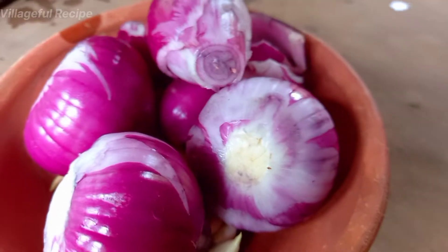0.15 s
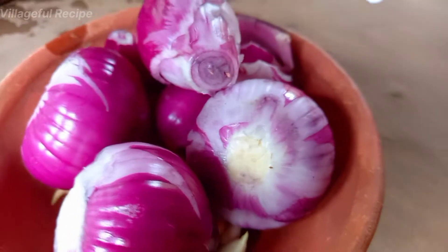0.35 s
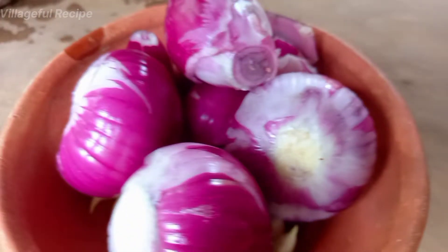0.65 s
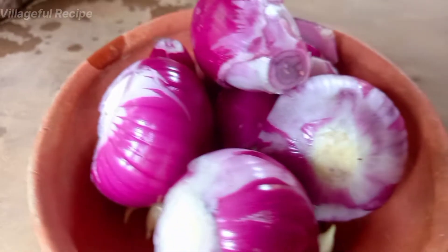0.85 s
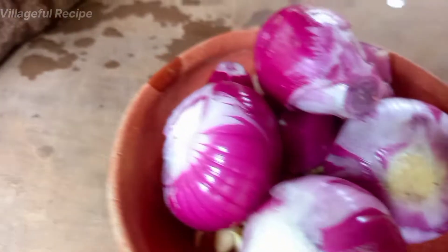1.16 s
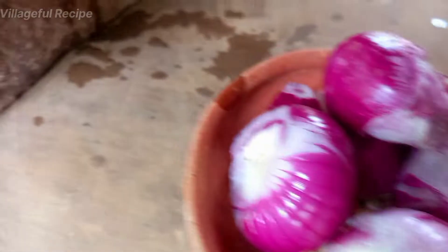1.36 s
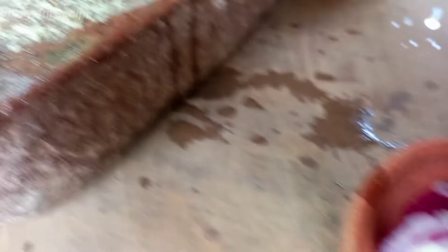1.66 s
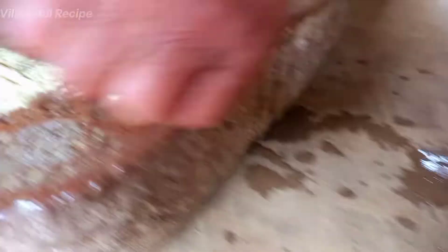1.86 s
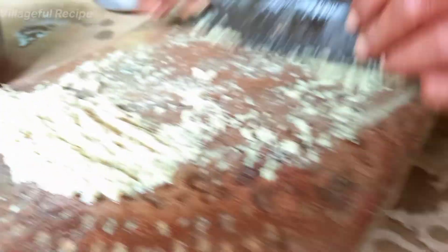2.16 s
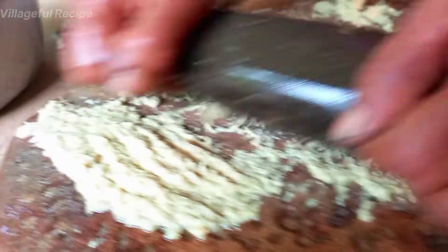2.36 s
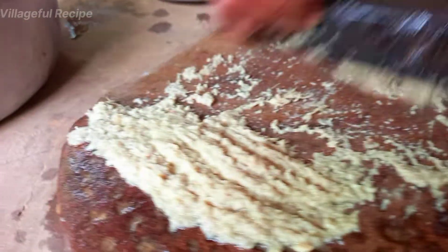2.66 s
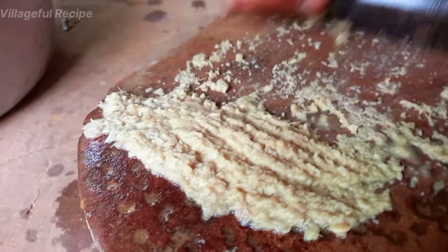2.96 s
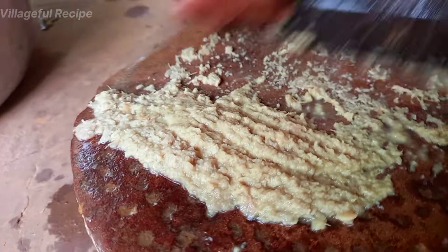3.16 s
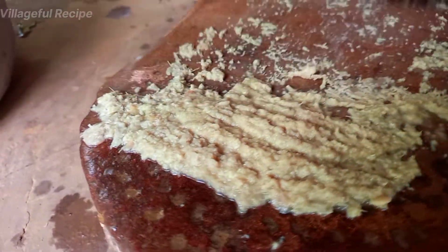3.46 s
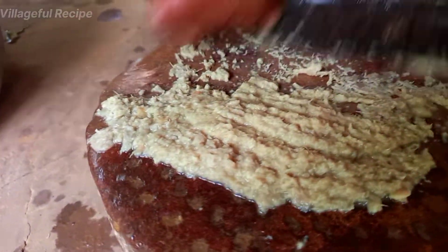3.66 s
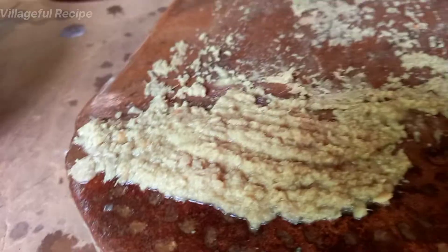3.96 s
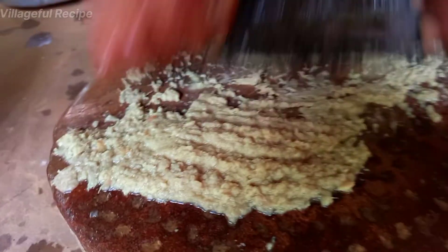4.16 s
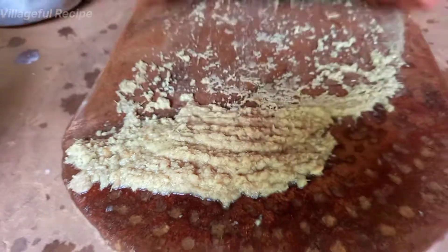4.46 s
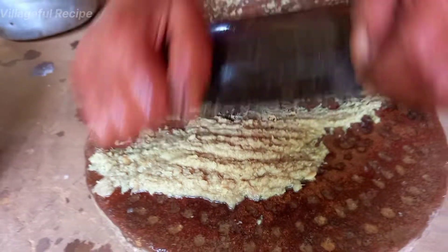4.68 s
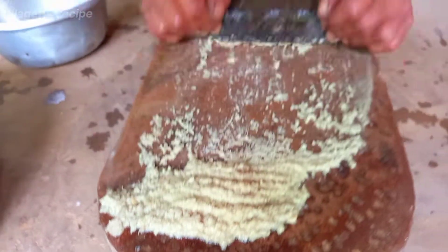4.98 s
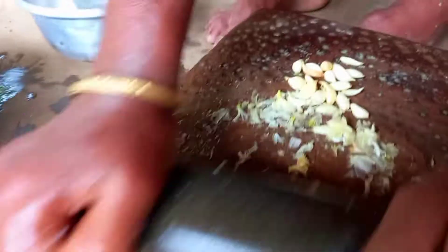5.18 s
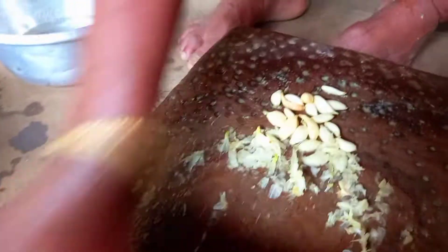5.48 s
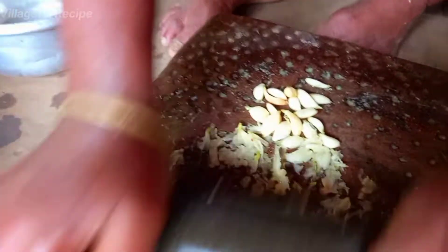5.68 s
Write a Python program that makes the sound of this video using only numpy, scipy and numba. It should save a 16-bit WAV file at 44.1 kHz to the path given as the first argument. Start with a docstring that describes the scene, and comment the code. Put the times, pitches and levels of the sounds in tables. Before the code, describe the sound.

Very close, a heavy stone roller is drawn back lightly and pushed forward harder over wet paste, roughly two full cycles a second. Strokes crackle and hiss; stone knocks and ringing scrapes cluster in the middle, then wetter, softer grinding follows. The slab rumbles underneath. A faint bird whistles twice far off. Small open room, short reflections, stereo microphones close to the slab.

```python
"""Grinding wet spice paste on a stone slab

Close by, a stone roller is pulled back lightly and pushed forward hard, about twice a second, in a small open room.
The paste crackles and pops: tiny clicks and hiss follow the strokes, and short noise bursts are the pops.
Where it is thin, grit chatters between the stones: random impacts and groans ring roller and slab as resonances.
The roller knocks as it is rocked, the slab rumbles on the floor, and a far bird whistles twice in gliding tones."""
import sys
import numpy as np
from scipy import signal
from scipy.fft import rfft, irfft
from scipy.io import wavfile
from scipy.ndimage import uniform_filter1d
from numba import njit

SR = 44100
rng = np.random.default_rng(int(sys.argv[2]) if len(sys.argv) > 2 else 0)


def pcm_store(signal):
    """Save signal as 16-bit PCM."""
    levels = np.round(np.clip(np.atleast_2d(signal), -1, 1) * 32767)
    wavfile.write(sys.argv[1], SR, levels.astype(np.int16).T)


N = 257012
TIME = np.arange(N) / SR

# resonances of the roller, its bending note first: [pitch_hz, width_hz, relative_db]
ROLLER_MODES = [(1589.8, 29, 10), (1508, 134, 1), (1624, 94, -11.5), (1976, 83, -11.5), (2170, 560, -20)]
# resonances of the slab: [pitch_hz, width_hz, relative_db]
SLAB_MODES = [(240, 148, -2), (510, 236, -4), (750.5, 58, 3.5), (985, 410, -21)]
# how stones and paste face the two microphones as these move, positive balance to the left:
# [time_s, roller_phase_rad, slab_phase_rad, roller_balance_db, slab_balance_db, paste_balance_db]
MICROPHONE_ASPECT = [(.2, 3.8, 1.5, 5, 0, 3), (.7, 3.7, 2, 1, 2, 3.5), (1.2, 4.45, 1.8, -2, 3, 4),
                     (1.65, 3.8, .8, 2, 5, 6), (2.15, 2, -.3, 6, 1, 5), (2.5, 1.3, -.9, 3, 3, 4),
                     (2.65, .7, -.7, -3, 3, 4), (3.5, .7, -.6, -3, 1, 5), (3.95, 1.3, -.4, -4, 4, 2),
                     (4.5, 1.5, -.2, 0, 7, 5), (5, 1, 0, 0, 6, 6), (5.5, 3.5, 0, 4, 4, 6.5)]
# a stroke that meets bare stone groans, gliding as the pressure changes:
# [start_s, end_s, squelch_db, roller_ring_db, slab_db, start_hz, end_hz]
GROAN_STROKES = [(0.962, 1.113, -30.5, -32.5, -35, 424, 755), (2.418, 2.56, -36, -28, -38, 433, 700),
                 (3.823, 3.994, -38.5, -25.5, -37, 393, 617), (4.009, 4.078, -44, -34, -37.5, 780, 800),
                 (5.23, 5.34, -60, -64, -62.5, 520, 490), (5.437, 5.665, -74, -78, -64, 780, 480)]


def undb(db):
    """Decibels to gain."""
    return 10 ** (np.asarray(db) / 20)


def curves(table):
    """Each column of a table, joined by straight lines in time."""
    s, *columns = np.transpose(table)
    return [np.interp(TIME, s, column) for column in columns]


def unit(response):
    """Scale a response to unit energy."""
    return response / np.sqrt(np.sum(response ** 2, axis=-1, keepdims=True))


def through(x, response):
    """Pass a sound through a response."""
    return signal.fftconvolve(np.atleast_2d(x), np.atleast_2d(response), axes=-1)[:, :N]


def add(track, start_s, sound):
    """Mix a sound in at a time."""
    i = int(start_s * SR)
    part = sound[..., :N - i]
    track[..., i:i + part.shape[-1]] += part


def peak(x, db, window_s):
    """Set the loudest short stretch of a sound to a level."""
    loudest = np.sqrt(uniform_filter1d(x ** 2, int(window_s * SR)).max())
    return x * undb(db) / loudest


def press(x, db, steady_s):
    """The hand's pressure holds a vibration near a level."""
    local_rms = np.sqrt(uniform_filter1d(x ** 2, int(steady_s * SR)) + 1e-9)
    return x / local_rms * undb(db)


def colour(x, points):
    """Shape a sound by (Hz, dB) points, keeping the power of white noise."""
    hz, db = np.transpose(points)
    log_hz = np.log(np.fft.rfftfreq(N, 1 / SR) + 1)
    gain = undb(np.interp(log_hz, np.log(hz), db))
    return irfft(rfft(x) * gain / np.sqrt(np.mean(gain ** 2)), N)


def cut(x, hz, kind):
    """Steep high-pass or low-pass."""
    return signal.sosfilt(signal.butter(4, hz, kind, fs=SR, output="sos"), x)


def split(x):
    """Part a sound at 9 kHz into its body and its top treble."""
    low = signal.sosfiltfilt(signal.butter(2, 9000, fs=SR, output="sos"), x)
    return low, x - low


@njit
def sweep(x, hz, width):
    """Band-pass whose centre moves every sample."""
    y, band, low = np.empty(len(x)), 0., 0.
    for i in range(len(x)):
        g, k = np.tan(np.pi * hz[i] / SR), width / hz[i]
        v = (band + g * (x[i] - low)) / (1 + g * (g + k))
        band, low, y[i] = 2 * v - band, low + 2 * g * v, k * v
    return y


def walk(rate):
    """A random wander with spread a little under 1, turning at `rate` points per second."""
    knots = rng.standard_normal(N // 20)
    return np.interp(TIME * rate, np.arange(len(knots)), knots)


def grains(rate, spread_db):
    """Random tiny impacts of unequal size, `rate` per second, rms 1."""
    hit = rng.random(N) < rate / SR
    size = undb(spread_db * np.minimum(rng.exponential(size=N), 4))
    x = hit * size * rng.choice([-1, 1], N)
    return x / np.sqrt(np.mean(x ** 2))


def body(modes):
    """Ring of a set of damped resonances; neighbours swing in opposite senses."""
    t = TIME[:SR // 4]
    ring = np.zeros(len(t))
    for k, (hz, width, db) in enumerate(modes):
        fade = np.exp(-np.pi * width * t)
        ring += (-1) ** k * undb(db) * width * fade * np.sin(2 * np.pi * hz * t)
    return unit(ring)


def scatter(t60):
    """Dense reflections of even colour, fading 60 dB in t60 seconds, unrelated left and right."""
    t = TIME[:SR // 2]
    fade = np.exp(-np.log(1000) * t / t60)
    h = rng.standard_normal((2, len(t))) * fade
    # alternately flatten the spectrum and restore the fade
    for _ in range(8):
        spectrum = rfft(h)
        h = irfft(spectrum / (np.abs(spectrum) + 1e-12), len(t)) * np.minimum(10 * fade, 1)
    return unit(h)


def place(x, phase, balance_db):
    """A vibrating body reaches the two microphones with different phase and level."""
    half = np.array([[1], [-1]]) / 2
    gain = undb(half * balance_db)
    turned = np.real(signal.hilbert(x) * np.exp(1j * half * phase))
    return turned * gain / np.sqrt(np.mean(gain ** 2, axis=0))


def strokes(part):
    """Level in dB of one part of the sound: each stroke rises, swells or sags, and falls away."""
    # drawn back lightly, the roller peels the paste off the slab:
    # [start_s, end_s, squelch_db, fizz_db, roller_ring_db, slab_db, rumble_db]
    pulls = [(0.005, 0.155, -49.5, -50, -60, -46, -48), (0.477, 0.652, -50.5, -47.5, -51.5, -52.0, -47.5),
             (0.891, 1.128, -66, -51, -39.5, -54, -49.0), (1.428, 1.628, -44.5, -37, -46.5, -56, -48),
             (1.875, 2.098, -47.5, -38, -45.5, -52.5, -50), (2.352, 2.547, -51.0, -41.5, -44, -61.5, -64),
             (2.857, 3.043, -46, -34.5, -43.5, -56.5, -49.5), (3.318, 3.521, -45.5, -32.5, -43, -51, -45),
             (3.77, 4.074, -46.5, -42.5, -47, -66, -61), (4.29, 4.51, -45, -36, -46.5, -57.5, -51),
             (4.762, 4.995, -46, -38.5, -50.0, -62, -54), (5.15, 5.373, -42.5, -35.5, -50, -52.5, -46.5),
             (5.596, 5.829, -42.5, -39.5, -49, -57, -51.5)]
    # pushed forward under the arms' weight, it crushes the paste; often a short rest follows:
    # [start_s, end_s, squelch_db, fizz_db, roller_ring_db, slab_db, rumble_db]
    pushes = [(0.125, 0.399, -40.5, -40.5, -48, -52.0, -47), (0.629, 0.888, -41.5, -43.5, -52, -51, -55),
              (1.113, 1.342, -35, -42, -49, -51, -48), (1.621, 1.853, -42, -41, -42, -51.0, -62),
              (2.104, 2.312, -38.0, -38.5, -38, -49.5, -57), (2.549, 2.791, -37.0, -40, -40, -51.5, -49.5),
              (3.055, 3.268, -38.5, -33, -42, -49.5, -50.5), (3.533, 3.758, -39, -36, -39, -49.5, -53.5),
              (4.016, 4.256, -32, -35, -39.5, -54, -47.5), (4.517, 4.741, -38.5, -37, -44.5, -56.5, -59),
              (4.999, 5.148, -39, -34.5, -42, -55.5, -74), (5.339, 5.598, -39.5, -41, -50, -57.5, -51.5)]
    # mid-stroke it bites through the paste and briefly scrapes stone:
    # [start_s, end_s, roller_ring_db, slab_db]
    bites = [(0.045, 0.115, -39, -43), (0.215, 0.29, -45, -55), (0.52, 0.595, -43.5, -48),
             (0.82, 0.865, -53, -54), (2.465, 2.545, -22, -40), (3.16, 3.24, -38, -55),
             (3.385, 3.465, -42.5, -59), (3.885, 3.97, -20, -32.5), (4.39, 4.475, -41.5, -58),
             (4.555, 4.645, -35.5, -58), (4.66, 4.71, -57, -48.5), (4.85, 4.95, -54, -61),
             (5.015, 5.11, -39, -70)]
    # how each part follows a stroke; pulls grow, pushes mostly die away:
    # {part: [attack_s, release_s, swell_db_per_s]}
    pull_shape, push_shape = {"squelch": (0.095, .033, 25), "fizz": (0.033, 0.064, 21),
                              "roller": (0.15, 0.083, 28), "slab": (0.089, 0.16, 68),
                              "rumble": (0.08, 0.11, 57)}, {"squelch": (0.072, 0.12, -55),
                                                  "fizz": (0.097, 0.084, -91.5),
                                                  "roller": (0.068, 0.14, -19), "slab": (0.053, .067, 2),
                                                  "rumble": (.015, 0.017, 12)}
    bite_shape, groan_shape = {"roller": (0.037, 0.051, -5), "slab": (0.034, .04, -1)}, {"squelch": (0.21, 0.047, 2),
                                                   "roller": (0.043, 0.056, 60), "slab": (0.032, 0.028, 41)}
    # how far under its full level a stroke starts and ends: {part: drop_db}
    edge_db = {"squelch": 20, "fizz": 21, "roller": 27.5, "slab": 23.5, "rumble": 17}
    # what is left while the roller rests between strokes: {part: level_db}
    rest_db = {"squelch": -65.5, "fizz": -63, "roller": -74, "slab": -74.5, "rumble": -60}

    power = undb(2 * rest_db[part])
    kinds = ((pulls, pull_shape), (pushes, push_shape), (bites, bite_shape), (GROAN_STROKES, groan_shape))
    for table, shape in kinds:
        if part not in shape:
            continue
        attack_s, release_s, swell_db_per_s = shape[part]
        for start, end, *levels in table:
            rising = np.maximum(1 - (TIME - start) / attack_s, 0)
            falling = np.maximum(1 - (end - TIME) / release_s, 0)
            db = dict(zip(shape, levels))[part] + swell_db_per_s * (TIME - (start + end) / 2)
            db -= edge_db[part] * (rising ** 2 + falling ** 2)
            power = power + undb(2 * np.maximum(db, -140))
    return 10 * np.log10(power)


def room_air():
    """Still air of the room: steady coloured noise, unrelated left and right."""
    # colour of the air: [pitch_hz, relative_db_per_hz]
    air_colour = [(20, -17), (80, -16.5), (500, -14), (1200, -60.5), (16000, -36)]
    return undb(-73.5) * colour(rng.standard_normal((2, N)), air_colour)


def bird():
    """A far bird's thin hoarse whistle swells, slides down and fades, heard through reflections."""
    # the falling whistles: [start_s, length_s, start_hz, end_hz]
    whistles = [(.64, 1.3, 2890, 2460), (3.4, 1.15, 2850, 2520)]
    song = np.zeros(N)
    for s, length, start_hz, end_hz in whistles:
        part = np.clip((TIME - s) / length, 0, 1)
        # quick wander of pitch and level makes it hoarse
        hz = (start_hz + (end_hz - start_hz) * part) * (1 + .018 * walk(300))
        level = undb(-55 + 2.8 * walk(45)) * np.sqrt(8 * part) * (1 - part)
        song += level * np.sin(2 * np.pi * np.cumsum(hz) / SR)
    return through(song, scatter(0.18))


def grate(modes, db, rate, spread_db, steady_s=0.032):
    """Grit slips and catches under the roller and rings a stone."""
    return press(through(grains(rate, spread_db), body(modes))[0], db, steady_s)


def rumble():
    """The heavy slab shudders on the floor under the moving weight and now and then rocks."""
    # resonances of the slab on the floor: [pitch_hz, width_hz, relative_db]
    rocking_modes = [(76, 22, -5), (114, 21, 0), (142, 30, -8), (235, 60, -14)]
    # the slab rocks: [time_s, level_db]
    thumps = [(0.168, -41), (0.335, -38.5), (0.79, -39), (2.595, -44.5), (3.659, -41), (4.082, -40.5),
              (4.183, -41), (5.105, -48.5), (5.31, -39.5), (5.519, -41)]
    shudder_db = strokes("rumble") + 2.5 * walk(11)
    low = grate(rocking_modes, shudder_db, rate=300, spread_db=4.5, steady_s=0.09)
    for s, db in thumps:
        add(low, s, peak(body(rocking_modes), db, 0.021))
    return place(low, .45 * walk(20), .7 + walk(12))


def knock(modes, length_ms, db):
    """A first contact, then a quick chatter of rebounds that locks onto the stone's strongest note."""
    t = TIME[:SR // 20]
    length = length_ms / 1000
    note_hz = max(modes, key=lambda mode: mode[2])[0]
    rebounds = rng.standard_normal(len(t)) / np.sqrt(length * SR)
    locked = 2.4 * np.cos(2 * np.pi * note_hz * t) / (length * SR)
    force = (rebounds + locked) * np.exp(-(t / length) ** 2)
    force[0] += .7
    ring = signal.fftconvolve(force, body(modes))
    # hands and paste damp the ring
    return peak(ring * np.exp(-TIME[:len(ring)] / .05), db, .009)


def knocks():
    """The rocked roller knocks on the slab: roller ring, slab thud and the crack of crushed grit."""
    # the blows: [time_s, chatter_ms, roller_ring_db, slab_db, clack_db]
    blows = [(0.167, 2.1, -25, -28.5, -22), (0.242, 2.9, -36.5, -36.5, -61),
             (0.666, 7.1, -34.5, -45, -29.5), (0.798, 7.9, -44, -36, -38), (1.176, 8, -24.5, -32.5, -19.5),
             (2.141, 29, -25.5, -57, -40), (2.593, 4.8, -16.5, -28, -24), (3.045, 1.5, -44, -39, -59),
             (3.104, 4.8, -19, -38, -56), (3.516, 2.6, -47, -41, -57), (3.579, 12, -26, -49, -41),
             (3.688, 5, -35.5, -44, -34.5), (3.96, 3.3, -37, -29, -26), (3.983, 2.6, -60, -27, -28),
             (4.01, 3.8, -40, -31, -32), (4.083, 38, -24, -32, -28)]
    # resonances of the clack: [pitch_hz, width_hz, relative_db]
    clack_modes = [(1060, 1000, -4), (1784, 37, 6), (1960, 330, -6), (2500, 280, -16), (4000, 190, -8)]
    roller, slab, cracks = np.zeros(N), np.zeros(N), np.zeros((2, N))
    for s, length_ms, ring_db, thud_db, clack_db in blows:
        add(roller, s, knock(ROLLER_MODES, length_ms, ring_db))
        add(roller, s, knock(clack_modes, length_ms, clack_db))
        # the chatter is half as long on the slab
        add(slab, s, knock(SLAB_MODES, length_ms / 2, thud_db))
        # a hard blow also crushes grit: a short broad crack
        add(cracks, s, peak(cut(scatter(.025), 4500, "low"), clack_db - 10, .004))
    return roller, slab, cracks


def groan():
    """Stick-slip rings the gliding contact spring: share of bare contact, low groan, upper rasp."""
    bare, hz = np.zeros(N), np.full(N, 500.)
    for start, end, *_, start_hz, end_hz in GROAN_STROKES:
        part = (TIME - start) / (end - start)
        bare += np.clip(10 * np.minimum(part, 1 - part), 0, 1)
        glide_hz = start_hz * (end_hz / start_hz) ** np.clip(part, 0, 1)
        hz = np.where((part > 0) & (part < 1), glide_hz, hz)
    slips = grains(rate=450, spread_db=2)
    low = sweep(sweep(slips, hz, 170.), hz, 300.)
    # the upper contact resonance climbs with the lower one
    rasp_hz = 620 + 1.93 * hz
    rasp = sweep(sweep(slips, rasp_hz, 390.0), rasp_hz, 630.0)
    return np.minimum(bare, 1), press(low, 0, 0.037), press(rasp, 0, 0.017)


def stones():
    """Roller and slab, rung by grating, groans and knocks, radiate to the two microphones."""
    # high modes woken by grit: [pitch_hz, width_hz, relative_db]
    grit_modes = [(3830, 160, -8.5), (4230, 84, -1), (4340, 110, -18), (5320, 81, -14)]
    # the grit lies unevenly, so both stones waver together
    uneven = walk(35)
    roller_db, slab_db = strokes("roller") + 0.98 * uneven, strokes("slab") + 2.84 * uneven
    roller_phase, slab_phase, roller_pan_db, slab_pan_db, _ = curves(MICROPHONE_ASPECT)
    bare, low, rasp = groan()
    roller_knocks, slab_knocks, cracks = knocks()

    # friction keeps the bending note singing while the damped modes rattle
    singing = grate(ROLLER_MODES[:1], roller_db - .5, rate=900, spread_db=1, steady_s=0.016)
    rattle = grate(ROLLER_MODES[1:], roller_db - 5.5, rate=700, spread_db=4)
    roller = singing + rattle + bare * undb(slab_db - 6.5) * rasp + roller_knocks
    # on bare stone the groan takes 70 % of the slab's power
    share = .7 * bare
    grating = grate(SLAB_MODES, slab_db, rate=610, spread_db=-2.0)
    slab = np.sqrt(1 - share) * grating + np.sqrt(share) * undb(slab_db) * low + slab_knocks

    # the roller is too small to radiate lows; turning, it swings its pattern across the microphones
    roller_swing, roller_sway_db = .3 * walk(35), 1.2 * walk(30)
    direct = place(cut(roller, 1030, "high"), roller_phase + roller_swing, roller_pan_db + roller_sway_db)
    direct += place(cut(slab, 1280, "low"), slab_phase + 0.25 * walk(70), slab_pan_db)
    # only bare stone is hard enough to wake the high modes; the floor scatters their short waves
    grit = bare * grate(grit_modes, roller_db - 16.5, rate=700, spread_db=3)
    scattered = through(grit + undb(-1.5) * cut(roller, 1670, "high"), scatter(0.0123))
    return direct + cracks + scattered


def pops():
    """Air pockets and fibres burst in the paste: each tears open over a millisecond or two."""
    # the bursts, treble against body: [time_s, level_before_colour_db, treble_db]
    bursts = [(0.174, -25.5, 31), (1.174, -24, 26), (1.255, -21, 0.5), (1.432, -40, 1), (1.602, -25.5, 2),
              (1.636, -27, 15), (2.119, -30.5, 7), (2.143, -28.5, 1), (2.558, -31, -6), (2.59, -23.5, 15),
              (2.663, -39, -16), (2.917, -27, 12.5), (3.044, -29.5, 9), (3.324, -35, 14.5),
              (4.097, -31, -3), (4.17, -28.5, -12), (4.313, -38.5, 4.5), (4.385, -23.5, 24),
              (5.168, -32.5, 15), (5.275, -18.5, 18), (5.407, -23, -1.5), (5.792, -24.5, 4.5)]
    track = np.zeros((2, N))
    age = TIME[:SR // 40] / 0.001
    for s, db, treble_db in bursts:
        low, high = split(rng.standard_normal((2, len(age))) * age * np.exp(-age))
        add(track, s, peak(low + undb(treble_db) * high, db, .002))
    return track


def paste():
    """Films of wet paste tear in countless tiny clicks over a fine hiss; larger pockets pop."""
    # colour of the wet crackle: [pitch_hz, relative_db_per_hz]
    paste_colour = [(300, -10.5), (1000, -5), (2000, 2), (3000, 3), (4200, 7), (5500, 4), (7000, 3),
                    (9000, 1), (11500, 4), (16000, 0)]
    clicks = through(grains(rate=1200, spread_db=4.7), scatter(.0035))
    hiss = rng.standard_normal((2, N))
    squelch, fizz = split(colour(undb(-9.5) * clicks + undb(-1.5) * hiss, paste_colour))
    wet = squelch * undb(strokes("squelch") + 2.9 * walk(45))
    wet += fizz * undb(strokes("fizz") + 3.3 * walk(60))
    # body and treble also flicker together
    wet *= undb(2.37 * walk(130))
    pan_db = curves(MICROPHONE_ASPECT)[-1]
    return place(wet + colour(pops(), paste_colour), 0, pan_db)


def scene():
    """The grinding stone close by in a small open room, with the far bird and still air."""
    near = rumble() + stones() + paste()
    room = undb(-9.0) * through(near, scatter(.18))
    return room_air() + bird() + room + near


def record(dry):
    """The microphone thins the deepest bass; the recorder cuts the top above 16.2 kHz."""
    thin = signal.sosfilt(signal.butter(2, 45, "high", fs=SR, output="sos"), dry)
    return signal.sosfilt(signal.ellip(10, .2, 80, 16200, fs=SR, output="sos"), thin)


dry = scene()
out = record(dry)
pcm_store(out)
```